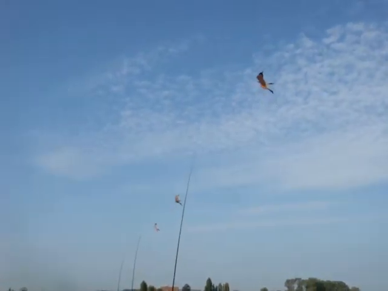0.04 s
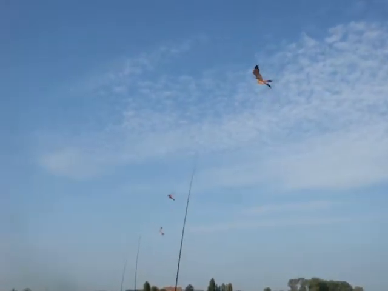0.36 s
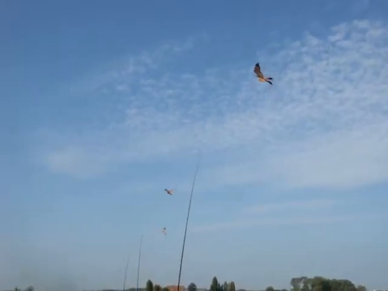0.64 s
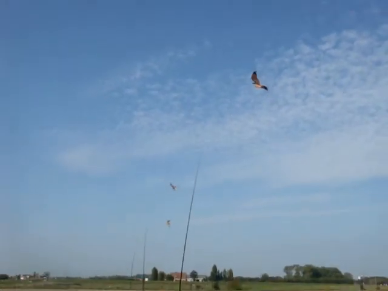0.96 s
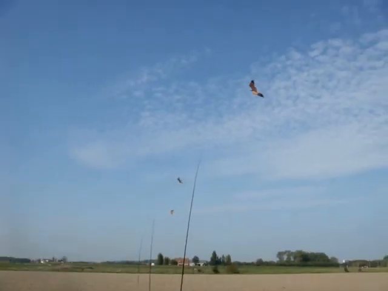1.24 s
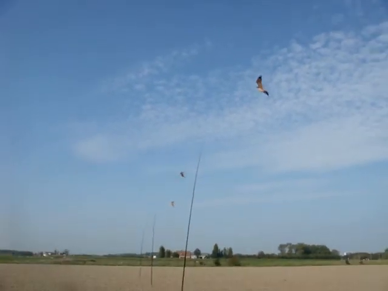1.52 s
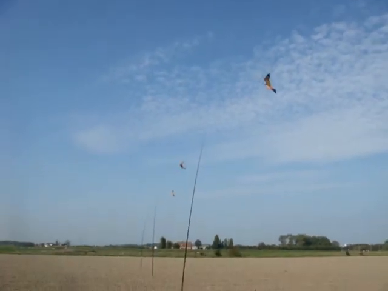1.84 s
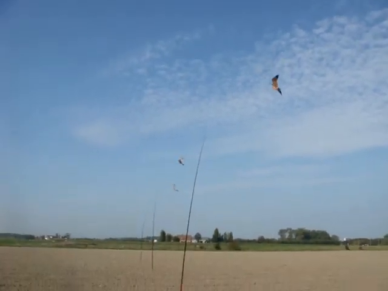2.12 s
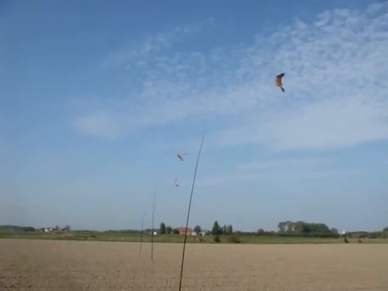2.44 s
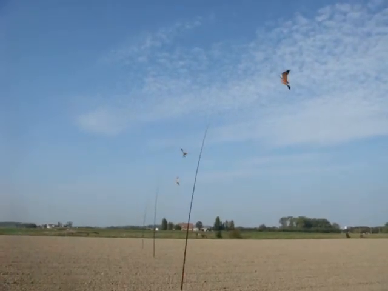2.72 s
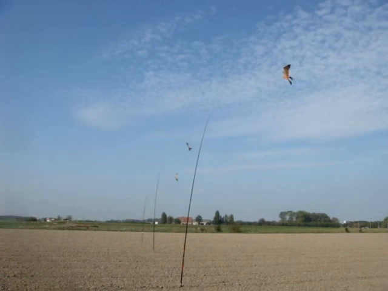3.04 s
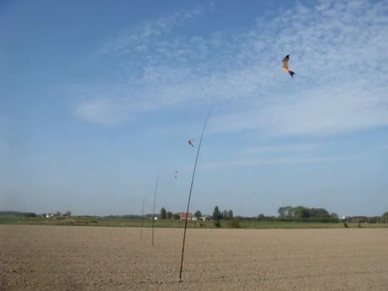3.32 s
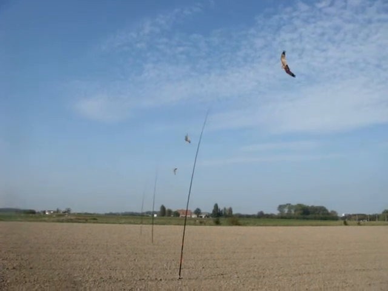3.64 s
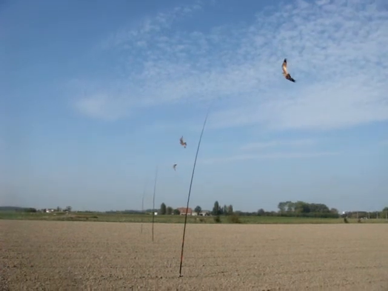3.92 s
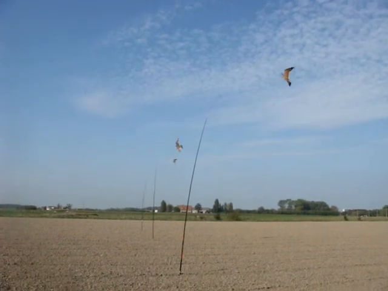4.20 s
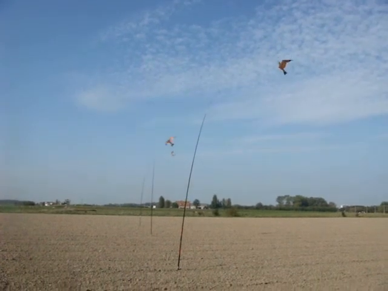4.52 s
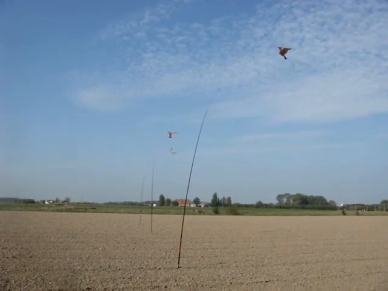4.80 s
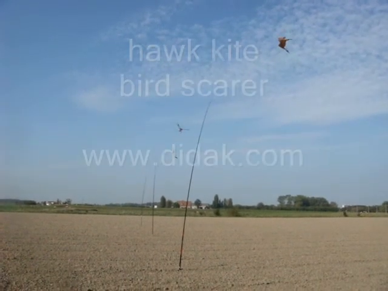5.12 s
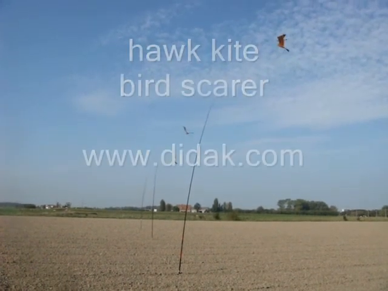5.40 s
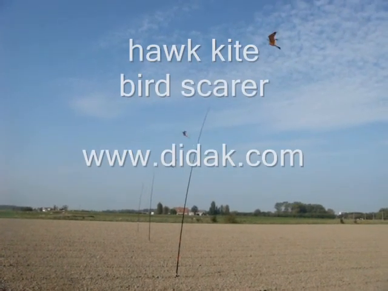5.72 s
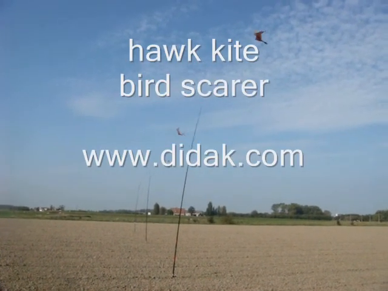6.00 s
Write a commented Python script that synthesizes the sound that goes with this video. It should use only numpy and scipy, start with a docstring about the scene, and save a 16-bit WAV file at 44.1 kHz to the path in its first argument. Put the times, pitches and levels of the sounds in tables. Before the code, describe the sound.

A nearby bird calls in wheezy, sliding whistles over low wind thumps on the microphone, soft hiss and distant twittering.

```python
"""Wind buffets a small camera in a flat, open field: swirls of air slap its microphone, dull and low.
A bird, likely a lapwing, gives wheezy, slurred whistles close by; fainter chirps come from further off.
Now and then the wind sings faintly on a kite line, and a soft hiss lies under it all.
The birds and the hiss have a gritty treble, because they are sampled coarsely and each sample is held."""
import sys
import numpy as np
from scipy import signal
from scipy.fft import rfft, irfft
from scipy.io import wavfile
from scipy.ndimage import uniform_filter1d

SR = 44100
rng = np.random.default_rng(int(sys.argv[2]) if len(sys.argv) > 2 else 0)


def wav_record(signal):
    """Record a signal, one row per channel, as 16-bit PCM in the file named by sys.argv[1]."""
    frames = np.transpose(np.atleast_2d(signal))
    bounded = np.clip(frames, -1, 1)
    # unit amplitude maps onto the largest positive 16-bit level
    quanta = np.round(bounded * 32767).astype(np.int16)
    wavfile.write(sys.argv[1], SR, quanta)


N = 271215
TIME = np.arange(N) / SR
FREQS = np.arange(N // 2 + 1) * SR / N + 1e-3

# tone colour of the steady hiss: frequency_hz, gain_db
HISS_COLOUR = [(25, 17.5), (100, 27.5), (500, 5.5), (900, 5), (1400, 6), (2000, 9), (3000, 9), (5000, 7.5)]
# loudness of the steady hiss: time_s, level_db
HISS_LEVELS = [(0, -46), (1.7, -47.5), (2.7, -45.5), (3.5, -46.5), (4.6, -43), (6.15, -44)]
# tone colour of a bright rush of noise: frequency_hz, gain_db
RUSH_COLOUR = [(300, -1), (1700, -8), (2600, -2), (3400, 2.5), (5000, 5)]
# bursts of that rush: time_s, level_db
RUSH_PEAKS = [(.005, -38), (0.122, -28)]
# lift in the lower tones of the gritty sound: frequency_hz, gain_db
GRIT_LIFT = [(500, 0), (900, 5), (1350, 3), (2000, 0)]

# stray far chirps: start_s, length_s, start_hz, end_hz, level_db
FAR_CHIRPS = [(1.05, .044, 2700, 2680, -56.5), (4.356, 0.034, 3720, 4110, -46),
              (4.487, 0.03, 4200, 3230, -46.5), (4.54, .044, 3680, 4350, -48.5),
              (4.892, 0.034, 3600, 3600, -47.5), (4.962, 0.04, 4140, 4580, -53),
              (5.307, .055, 3960, 4430, -68), (5.464, 0.05, 4330, 4820, -59),
              (6.112, 0.027, 3210, 3370, -44.5)]
# a far bird repeats a flat two-voiced note, then a hook up and down: hook_start_s, note_db, hook_db
FAR_TWITTER = [(2.14, -61, -53), (2.288, -52, -47), (2.444, -50.5, -49), (2.608, -50, -50.5),
               (2.774, -53.5, -52.5), (2.96, -55, -54), (3.184, -62.5, -58)]
# tones of the kite line, one list per swell: time_s, pitch_hz, level_db
KITE_SWELLS = [
    [(2.6, 434, -79), (2.74, 452, -57), (2.88, 423, -62)],
    [(3.48, 496, -50.5), (3.55, 646, -42), (3.61, 666, -40.5), (3.69, 641, -47.5), (3.8, 580, -49)],
    [(4.22, 490, -50), (4.42, 511.6, -41), (4.65, 486, -50.5)],
    [(5.2, 475, -62), (5.33, 490, -53), (5.46, 502, -45), (5.63, 478, -56), (5.76, 480, -66)],
]

# the near bird's rolling calls, all one phrase: start_s, time_stretch, pitch_ratio, level_db
ROLLING_CALLS = [(4.0616, 0.98, 0.99, -21.5), (5.749, .936, .995, -17.5)]
# the sliding notes (slurs) of that phrase:
# start_s, rise_s, fall_s, start_hz, top_hz, soft_opening_s, swell_s, release_s, level_db, fade_db
ROLL_SLURS = [(.008, 0.035, .038, 2820, 3100, 0.0085, 0.018, 0.019, -2, -0.8),
              (.084, .065, .055, 3284, 3380, 0.055, .042, 0.0056, 1.5, 3.5),
              (.21, .002, .036, 3120, 3094, .001, .005, .014, -3.5, 0.5),
              (.24, 0.015, .046, 3130, 3130, 0.0093, .013, 0.0047, -9, 15)]
# its drawn-out wails, one list per note: time_s, pitch_hz, level_db
WAIL_NOTES = [
    [(3.598, 2890, -47), (3.616, 3037, -33.5), (3.626, 2710, -29), (3.646, 2435, -38), (3.656, 2443, -29),
     (3.682, 2470, -36.5), (3.69, 2600, -42), (3.695, 2515, -45)],
    [(3.702, 2300, -42), (3.712, 2161, -38), (3.724, 2130, -38.5), (3.74, 2340, -33.5), (3.764, 2444, -35),
     (3.792, 2640, -53)],
    [(4.612, 2606, -43), (4.624, 2540, -32), (4.64, 2686, -24), (4.652, 2711, -20.5), (4.666, 2408, -29.5),
     (4.674, 2304, -25), (4.68, 2560, -27), (4.688, 2530, -27)],
    [(4.694, 2537, -33), (4.7, 2558, -26.5), (4.718, 2460, -37), (4.746, 2295, -25), (4.796, 2310, -27.5),
     (4.808, 2300, -25), (4.846, 2407, -36)],
    [(5.192, 2706, -36), (5.202, 2743, -31), (5.212, 3320, -27.5), (5.222, 3320, -39)],
]
# its two sharp downward sweeps: start_s, level_db
DOWNSWEEPS = [(.002, -30.5), (.111, -30.5)]
# its quick, straight flicks: start_s, length_s, start_hz, end_hz, level_db
QUICK_FLICKS = [(5.143, 0.026, 2724, 2730, -35.5), (5.172, 0.0124, 4140, 3380, -34),
                (5.218, .026, 3030, 2140, -36), (5.232, 0.021, 3300, 2780, -36.5)]
# the shrill upper voice that opens its first wail: time_s, pitch_hz, level_db
SHRILL_VOICE = [(3.606, 4350, -46), (3.62, 4950, -26), (3.636, 5300, -47)]
# hoarse moments where a call starts or breaks: time_s, half_length_s, roughness (0 to 1)
HOARSE_MOMENTS = [(3.61, 0.018, 0.24), (3.72, 0.028, 0.57), (4.196, 0.02, 0.24), (4.72, 0.019, 0.56),
                  (5.164, 0.035, 0.53), (5.874, 0.02, .3)]
# resonances that colour its wheeze: centre_hz, width_hz, gain_db
WHEEZE_PEAKS = [(2946, 190, 13), (3506, 52, 12), (4170, 320, 2), (4820, 100, 10.5)]
# short echoes of its calls: delay_s, gain_db
ECHOES = [(.0085, -13), (0.0203, -20.5)]

# slow rise and fall of the wind: time_s, level_db, brightness_db
WIND_COURSE = [(0, -38, -52), (.1, -29, -6), (.21, -34.5, -23.5), (.28, -29, -9.5), (.58, -28.5, -13),
               (.95, -36.5, -23), (1.2, -29.5, -13.5), (1.55, -33.5, -24), (1.63, -28, -12),
               (1.8, -29, -12), (2.11, -32.5, -13.5), (2.31, -40.5, -18), (2.58, -38, -32.5),
               (3.02, -33.5, -20), (3.34, -36, -20), (3.54, -42.5, -24), (3.75, -31.5, -22),
               (3.93, -37, -25.5), (4.33, -29, -20.5), (4.95, -36, -24), (5.35, -37.5, -31.5),
               (5.68, -43.5, -30), (6.15, -40, -23)]
# lulls, when air briefly leaves the microphone's opening (its port): start_s, length_s, depth_db
WIND_LULLS = [(0.979, 0.07, 18), (1.284, 0.03, 6.5), (2.399, 0.021, 16), (2.63, 0.2, 22), (2.896, 0.02, 13),
              (3.419, 0.033, 6), (3.478, 0.014, 10), (3.91, 0.021, 18), (4.15, 0.029, 9),
              (4.532, 0.047, 7.5), (4.642, 0.017, 23), (5.104, 0.038, 27)]
# hard buffets, each a slap and a short surge: time_s, level_db
HARD_BUFFETS = [(0.261, -20), (0.344, -21.5), (0.418, -34), (0.565, -27), (0.723, -26), (0.813, -21),
                (1.073, -24), (1.362, -28), (1.386, -25), (1.45, -17.5), (1.594, -19.5), (1.654, -27),
                (1.833, -23), (1.853, -39), (2.374, -28.5), (2.514, -24), (2.85, -31), (2.919, -29),
                (3.077, -26), (3.255, -20.5), (3.353, -27.5), (3.44, -25.5), (3.718, -23.5), (3.958, -26),
                (4.022, -21.5), (4.198, -18.5), (4.492, -20), (4.582, -22), (4.846, -22.5), (5.029, -23.5),
                (5.076, -34)]
# tone colour of the buffeting: frequency_hz, gain_db
RUMBLE_COLOUR = [(20, -44), (40, -33.5), (75, -7.5), (140, 1), (250, 1.5), (500, -1.5), (800, -5.5),
                 (1200, -12), (1700, -21), (2600, -36), (5000, -59)]
# the port lets little of the wind's treble through: frequency_hz, gain_db
PORT_MUFFLING = [(1800, -1.5), (2600, -13), (4000, -28), (8000, -66)]
# tone colour of the fizz that rides the gusts: frequency_hz, gain_db
FIZZ_COLOUR = [(3000, -22), (6000, -1), (10000, -5.5), (12000, 8.5), (13500, 1.5), (15500, -4)]


def undb(db):
    """Turn decibels into a number to multiply by."""
    return 10 ** (np.asarray(db) / 20)


def unit(x):
    """Scale a signal so that its average strength (rms) is 1."""
    return x / np.sqrt(np.mean(x ** 2))


def curves(rows):
    """Join the points of each table column with straight lines in time."""
    times, *columns = np.transpose(rows)
    return [np.interp(TIME, times, column) for column in columns]


def bump(time_s, half_s):
    """A smooth swell of height 1 around time_s."""
    return np.exp(-((TIME - time_s) / half_s) ** 2)


def wander(rate_hz):
    """A smooth random wobble of strength 1 that changes about rate_hz times a second."""
    return unit(irfft(rfft(rng.standard_normal(N)) / (1 + (2 * FREQS / rate_hz) ** 4), N))


def colour(x, points):
    """Filter by (frequency_hz, gain_db) points, so that a slap rings only after it lands."""
    hz, db = np.transpose(points)
    gain = undb(np.interp(np.log(FREQS), np.log(hz), db))
    cepstrum = irfft(np.log(gain), N)
    cepstrum[1:] *= 2  # doubling one half and clearing the other puts all ringing after the hit
    cepstrum[N // 2:] = 0
    return irfft(rfft(x) * np.exp(rfft(cepstrum)), N)


def noise(points):
    """Noise of strength 1 with the given tone colour."""
    return unit(colour(rng.standard_normal(N), points))


def whistle(rows, waver, flutter_db, edge_s=.003, octave=0):
    """An unsteady tone along (time_s, pitch_hz, level_db) rows; it can add the octave above."""
    times, hz, db = np.transpose(rows)
    span = (TIME > times[0] - edge_s) & (TIME < times[-1] + edge_s)
    t = TIME[span]
    pitch = uniform_filter1d(np.interp(t, times, hz), size=220) * (1 + waver[span])
    phase = 2 * np.pi * np.cumsum(pitch) / SR
    fade = np.clip(np.minimum(t - times[0], times[-1] - t) / edge_s + 1, 0, 1)
    level = undb(np.interp(t, times, db) + flutter_db[span])
    out = np.zeros(N)
    out[span] = np.sqrt(2) * fade * level * (np.sin(phase) + octave * np.sin(2 * phase))
    return out


def chirp(start_s, length_s, pitches, db, taper_db):
    """Whistle rows for a short note that glides through its pitches and swells in the middle."""
    along = np.linspace(0, 1, 13)
    hz = np.interp(along, np.linspace(0, 1, len(pitches)), pitches)
    return np.transpose([start_s + length_s * along, hz, db - taper_db * np.abs(2 * along - 1)])


def field_echo(x, ring_s, echo_db):
    """Add the thin echo from furrows and hedges; it falls by 60 dB in ring_s."""
    t = TIME[:SR]
    tail = rng.standard_normal(SR) * np.exp(-np.log(1000) * t / ring_s) * (1 - np.exp(-t / .0078))
    return x + undb(echo_db) * signal.fftconvolve(x, tail / np.linalg.norm(tail))[:N]


def grit(x, hold_hz=16000, top_hz=5080):
    """Cut the highs, sample slowly and hold each sample: mirror images of each tone fill the treble."""
    narrow = signal.sosfiltfilt(signal.ellip(8, .1, 50, top_hz, fs=SR, output="sos"), x)
    held = signal.resample_poly(narrow, hold_hz, SR)[np.arange(N) * hold_hz // SR]
    return colour(held, GRIT_LIFT)


def hiss(flicker_db=.7, tail_db=-29.5, fade_db_per_s=27):
    """An even hiss, and a brighter rush that bursts twice and soon dies away."""
    steady = noise(HISS_COLOUR) * undb(curves(HISS_LEVELS)[0] + flicker_db * wander(40))
    bursts = sum(undb(db) * bump(s, half_s=.015) for s, db in RUSH_PEAKS)
    tail = undb(tail_db - fade_db_per_s * TIME)
    return steady + noise(RUSH_COLOUR) * (tail + bursts) * undb(1.1 * wander(140))


def far_birds(lead_s=.06, note_s=.058, low_hz=3200, high_hz=5000, hook_s=.029):
    """A run of twitters and a few stray chirps, blurred by distance."""
    hook_hz = (2980, 3280, 3700, 3350)
    waver = .04 * np.tanh(wander(700))
    flutter_db = 2.5 * wander(290)
    notes = [chirp(s, length, pitches, db, taper_db=8) for s, length, *pitches, db in FAR_CHIRPS]
    for s, note_db, hook_db in FAR_TWITTER:
        notes += [chirp(s - lead_s, note_s, [low_hz], note_db, taper_db=8),
                  chirp(s - lead_s, note_s, [high_hz], note_db - 4, taper_db=8),
                  chirp(s, hook_s, hook_hz, hook_db, taper_db=2)]
    song = sum(whistle(note, waver, flutter_db) for note in notes)
    return field_echo(song, ring_s=.35, echo_db=-6)


def kite_line():
    """Tiny whirls of air peel off a tight line and make it sing in faint, wavering swells."""
    waver, flutter_db = .017 * wander(27), 2.5 * wander(38)
    return sum(whistle(swell, waver, flutter_db, edge_s=.032) for swell in KITE_SWELLS)


def rolling_call(call_s, stretch, pitch_ratio, call_db, landing_hz=2737, soft_db=-24):
    """Whistle rows for each slur of a call: it slides to its top, then drops to a shared low pitch."""
    for start, rise, fall, start_hz, top_hz, opening, swell, release, db, fade_db in ROLL_SLURS:
        t = np.linspace(0, rise + fall + release, 100)
        up = np.sin(np.pi / 2 * np.minimum(t / rise, 1)) ** 2
        down = np.sin(np.pi / 2 * np.maximum(t - rise, 0) / fall) ** 2  # turns back as the note ends
        hz = start_hz + (top_hz - start_hz) * up + (landing_hz - top_hz) * down
        shape_db = np.interp(t, [opening, opening + swell, rise + fall, t[-1]],
                             [soft_db, 0, -fade_db, soft_db])
        yield np.transpose([call_s + stretch * (start + t), pitch_ratio * hz, call_db + db + shape_db])


def downsweep(start_s, db, pitches_hz=(5400, 4150, 3450, 2950), length_s=.046, fade_db=14):
    """Whistle rows for a note that fades as it falls, steeply at first and then more gently."""
    along = np.linspace(0, 1, len(pitches_hz))
    return np.transpose([start_s + length_s * along, pitches_hz, db - fade_db * along])


def near_bird(throb_hz=140, throb_depth=.44, wheeze_db=-3, coupling_db=18):
    """Sliding notes overlap and beat; when hoarse, the voice throbs and air wheezes through it."""
    rasps = sum(amount * bump(s, half_s) for s, half_s, amount in HOARSE_MOMENTS)
    roughness = np.clip(.085 + rasps, 0, 1)
    waver = (.003 + .02 * roughness) * wander(600)
    flutter_db = 1.48 * wander(190)
    notes = [slur for call in ROLLING_CALLS for slur in rolling_call(*call)]
    notes += list(WAIL_NOTES) + [downsweep(*row) for row in DOWNSWEEPS]
    notes += [chirp(s, length, pitches, db, taper_db=10) for s, length, *pitches, db in QUICK_FLICKS]
    voice = sum(whistle(note, waver, flutter_db, octave=undb(-30)) for note in notes)
    loudness = np.sqrt(np.abs(uniform_filter1d(voice ** 2, size=300)))
    shrill = whistle(SHRILL_VOICE, .027 * wander(770), flutter_db)
    # the two sides of the voice box mix, adding tones at the difference and sum of their pitches
    voice = voice + shrill + undb(coupling_db) * voice * shrill
    throb = np.sin(2 * np.pi * np.cumsum(throb_hz * (1 + .185 * wander(50))) / SR)
    throat = sum(undb(db) / (1 + (2 * (FREQS - hz) / width) ** 2) for hz, width, db in WHEEZE_PEAKS)
    breath = unit(irfft(rfft(rng.standard_normal(N)) * throat, N))
    wheeze = undb(wheeze_db) * roughness * loudness * breath
    voice = (voice + wheeze) * (1 + throb_depth * roughness * throb)
    echoes = sum(undb(db) * np.interp(TIME - delay_s, TIME, voice) for delay_s, db in ECHOES)
    return field_echo(voice + echoes, ring_s=.24, echo_db=-15.5)


def airflow(stall_s=.01, stall_db=3.5, close_s=.026, reopen_s=.012, surge_s=.013, surge_db=-5.5):
    """The wind's level and brightness in dB: it dips in lulls, and stalls then surges at each buffet."""
    gust_db, bright_db = curves(WIND_COURSE)
    stalls = sum(bump(s - stall_s, stall_s) for s, _ in HARD_BUFFETS)
    flow_db = gust_db + 1.4 * np.tanh(wander(34)) - stall_db * stalls
    for s, length, depth_db in WIND_LULLS:  # the air leaves more slowly than it returns
        inside = np.minimum((TIME - s) / close_s, (s + length - TIME) / reopen_s)
        flow_db -= depth_db * np.clip(inside + .5, 0, 1)
    surges = sum(undb(db + surge_db) * (TIME > s) * np.exp(-np.abs(TIME - s) / surge_s)
                 for s, db in HARD_BUFFETS)
    flow_db = 20 * np.log10(np.hypot(undb(flow_db), surges))
    return flow_db, bright_db + .5 * (flow_db - gust_db)  # a stronger flow is also brighter


def eddies(gap_samples=140, spread_db=2.5, treble_spread_db=10.5, neutral_db=-12, ceiling_db=-18):
    """Swirls of air (eddies) slap the microphone port; the stronger the swirl, the brighter the slap."""
    flow_db, bright_db = airflow()
    flapping_db = 2.3 * np.tanh(wander(80))  # eddies come in short bunches
    timing, size, direction = rng.random((N // gap_samples - 2, 3)).T
    hit_samples = ((np.arange(len(timing)) + 2 * timing) * gap_samples).astype(int)
    strength = np.sqrt(12) * (size - .5)
    push = np.sign(direction - .5) * np.sqrt(gap_samples)
    churn = undb(-6) * rng.standard_normal(N)  # finer turbulence between the slaps
    buffets = np.zeros(N)
    for s, db in HARD_BUFFETS:
        buffets[int((s + .002) * SR)] = undb(db - 3) * np.sqrt(gap_samples)
    level = undb(flow_db + .5 + flapping_db)
    pressure = np.zeros(N)
    octaves = np.arange(-2, 4)  # bands an octave apart, counted from 300 Hz
    for octave, pick in zip(octaves, np.eye(len(octaves))):
        tilt = max(octave / 2, -.23)  # hard wind tips the balance from bass to treble
        sizes = unit(undb((spread_db + treble_spread_db * np.clip(tilt, 0, 1)) * strength))
        slaps = np.bincount(hit_samples, push * sizes, N)
        tilt_db = tilt * (bright_db - neutral_db + flapping_db)
        blows = ((slaps + churn) * level + buffets) * undb(tilt_db)
        band = np.interp(np.log2(FREQS / 300), octaves, pick)
        pressure += irfft(rfft(blows) * band, N)
    rumble = colour(pressure, RUMBLE_COLOUR) / np.std(colour(unit(churn), RUMBLE_COLOUR))
    return undb(ceiling_db) * np.tanh(rumble / undb(ceiling_db))  # the hardest slaps flatten and spit


def wind_on_microphone(fizz_db=-34):
    """Buffeting dulled by the port, with a faint fizz that crackles in step with its pressure."""
    pressure = eddies()
    fizz = pressure * noise(FIZZ_COLOUR)
    return colour(pressure, PORT_MUFFLING) + undb(fizz_db) * fizz


def scene():
    """Gritty birds and hiss, with the kite line and the wind over them, in one channel."""
    gritty = grit(near_bird() + far_birds() + hiss())
    return (gritty + kite_line() + wind_on_microphone())[None]


def record(dry):
    """Cut off the very highest treble steeply."""
    top_hz, slope_width_hz = 15700, 300
    return irfft(rfft(dry) * np.clip((top_hz - FREQS) / slope_width_hz + .5, 0, 1), N)


dry = scene()
out = record(dry)
wav_record(out)
```